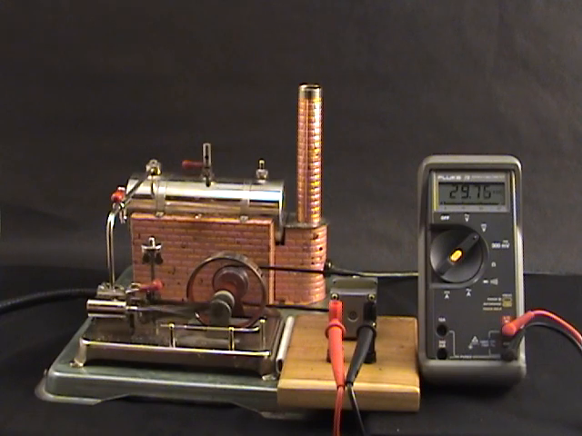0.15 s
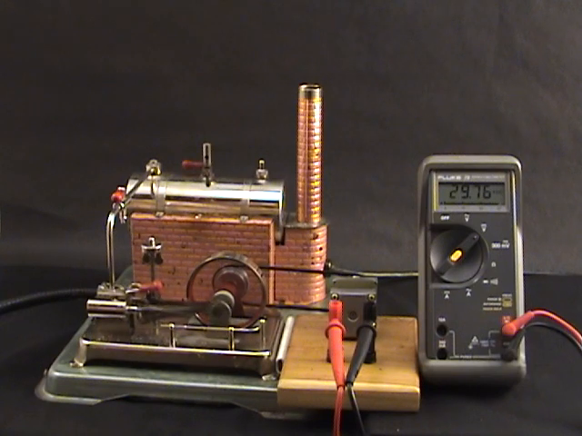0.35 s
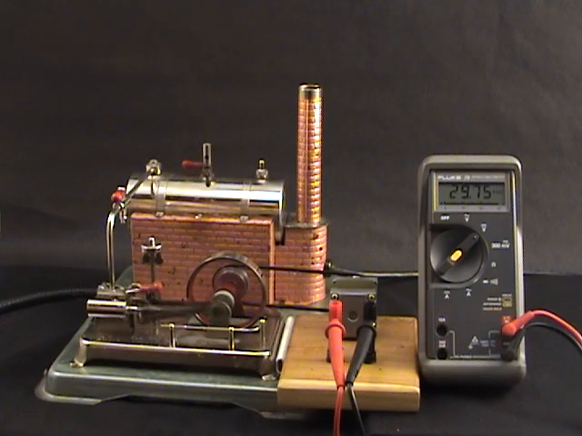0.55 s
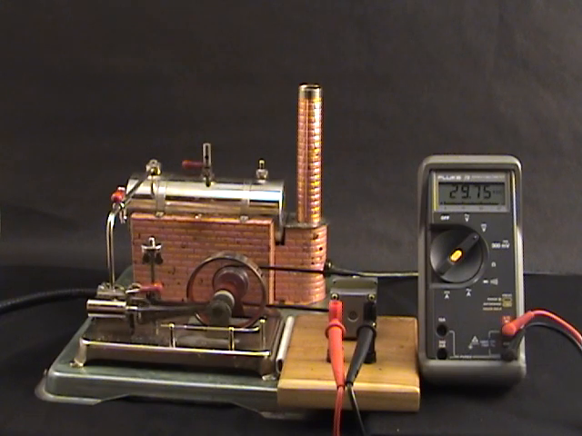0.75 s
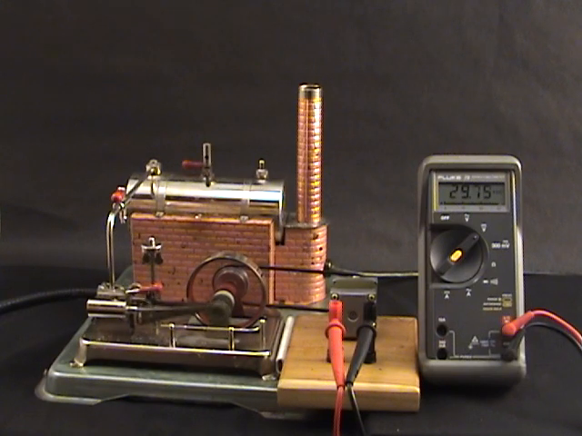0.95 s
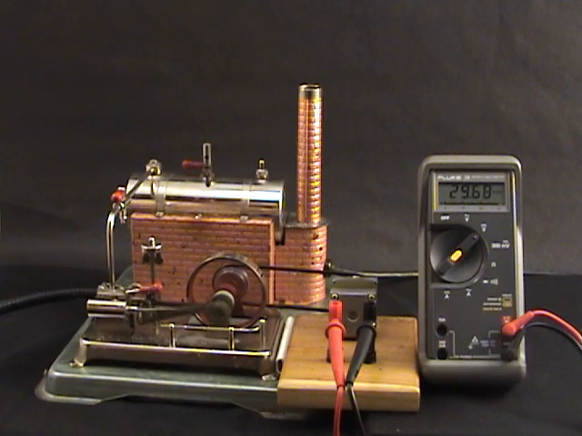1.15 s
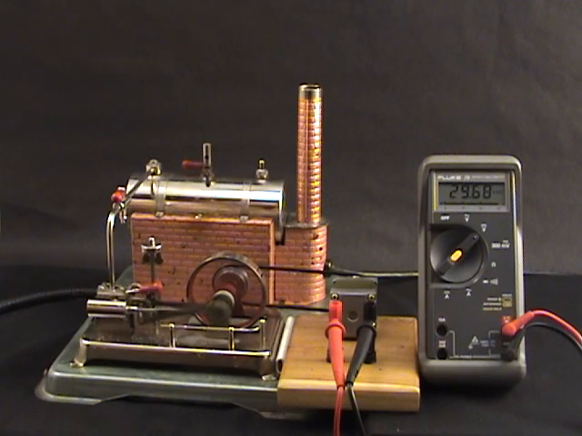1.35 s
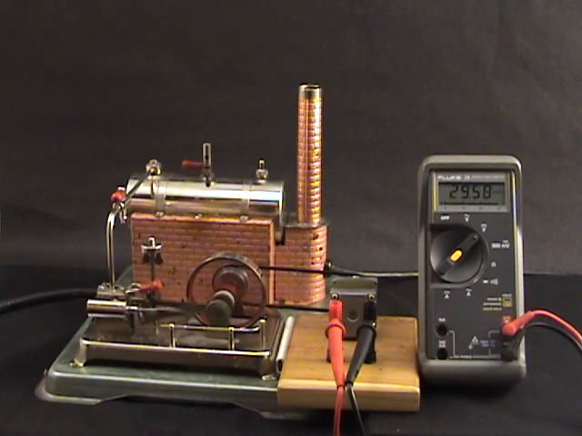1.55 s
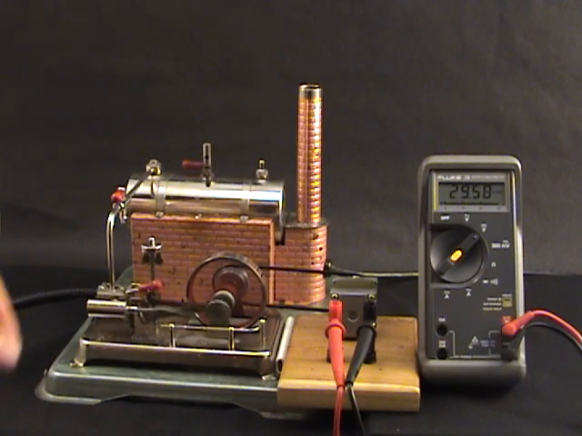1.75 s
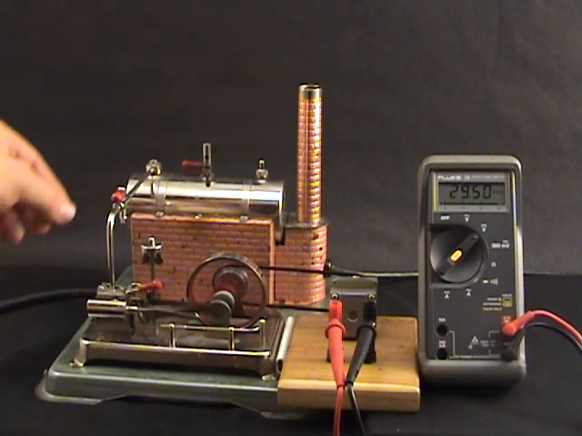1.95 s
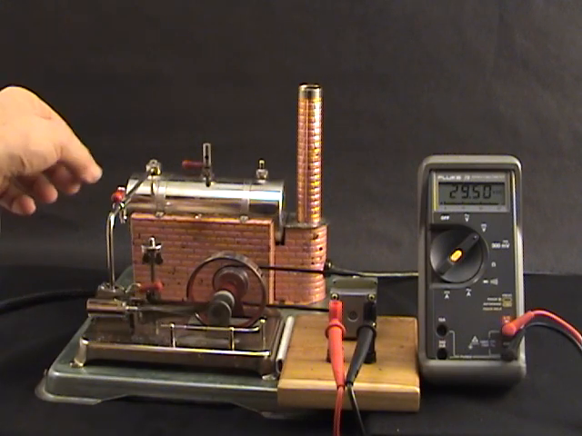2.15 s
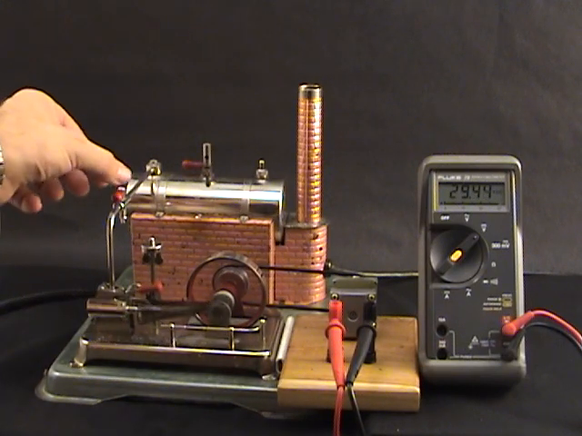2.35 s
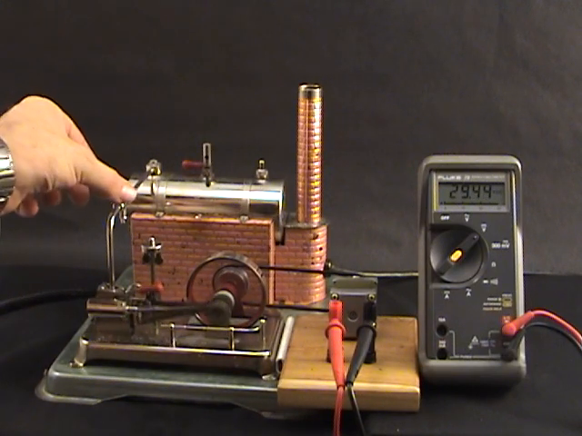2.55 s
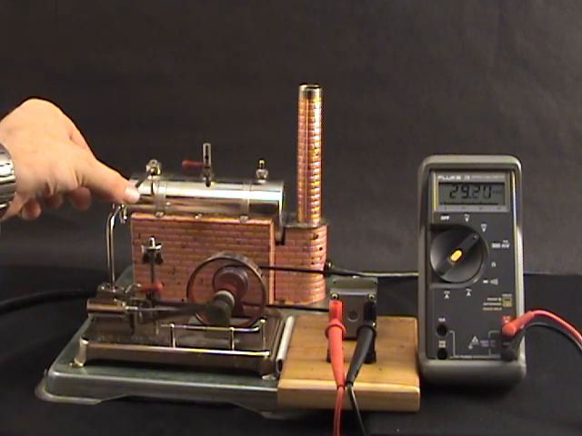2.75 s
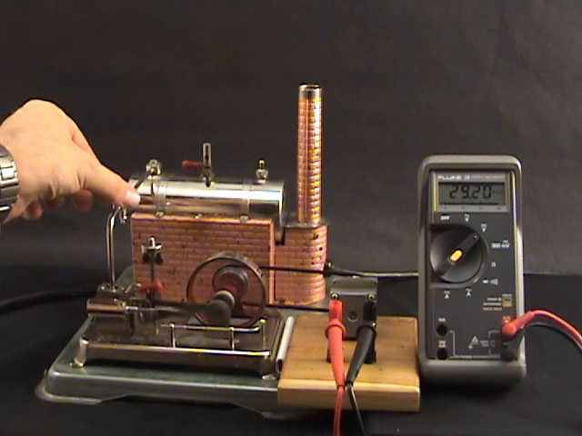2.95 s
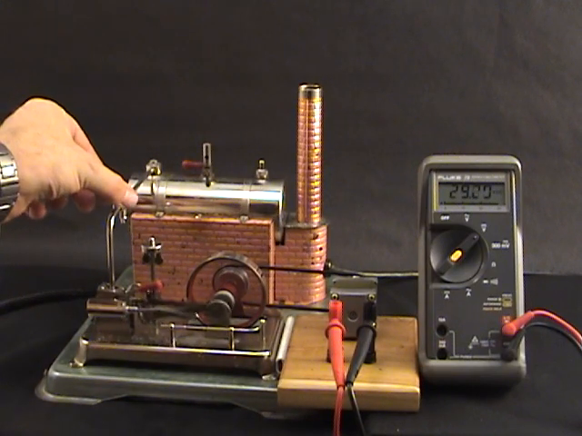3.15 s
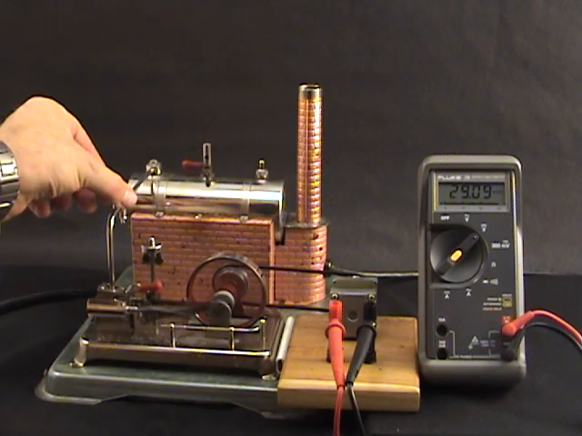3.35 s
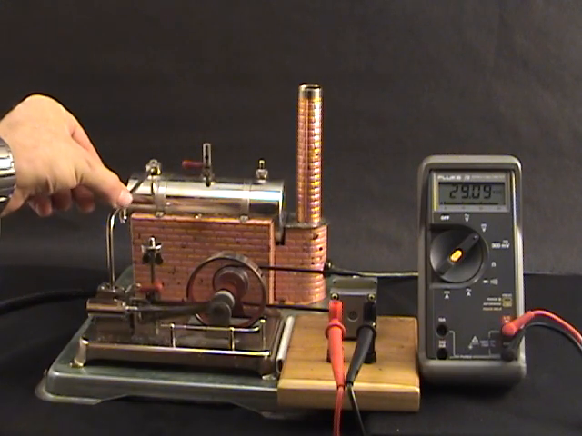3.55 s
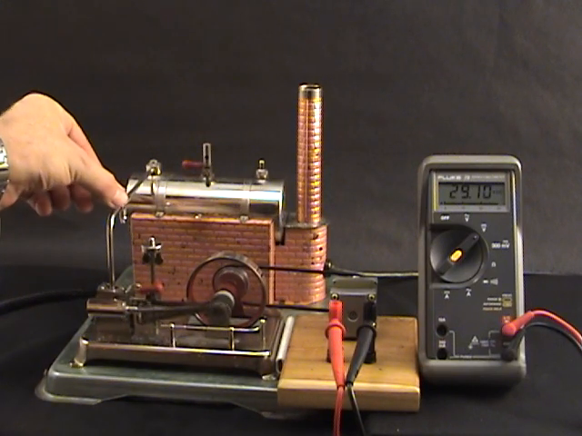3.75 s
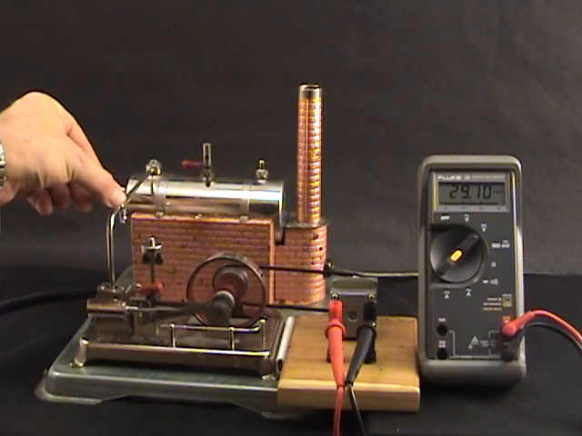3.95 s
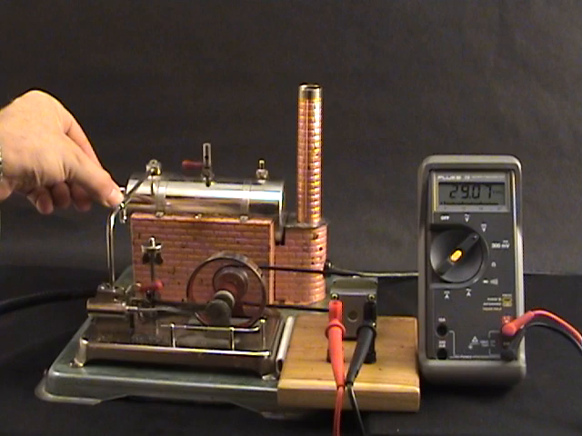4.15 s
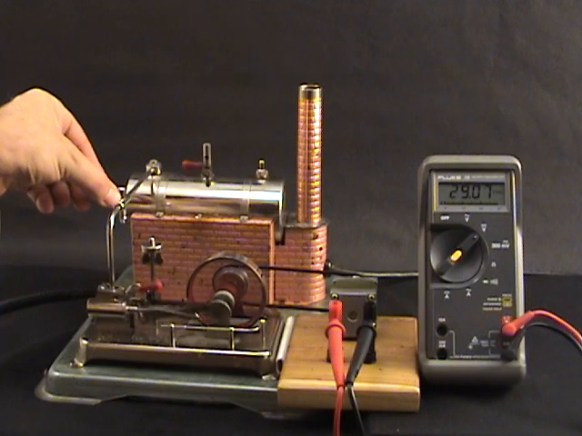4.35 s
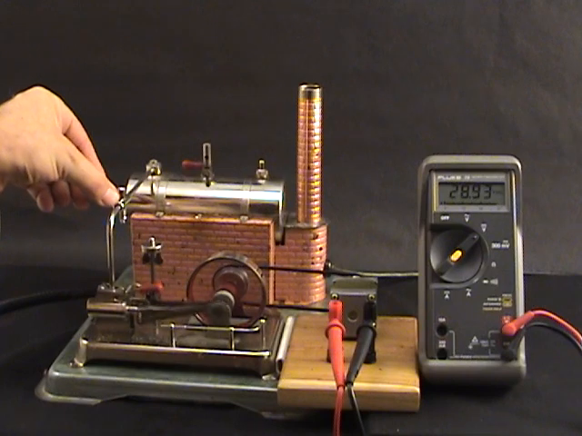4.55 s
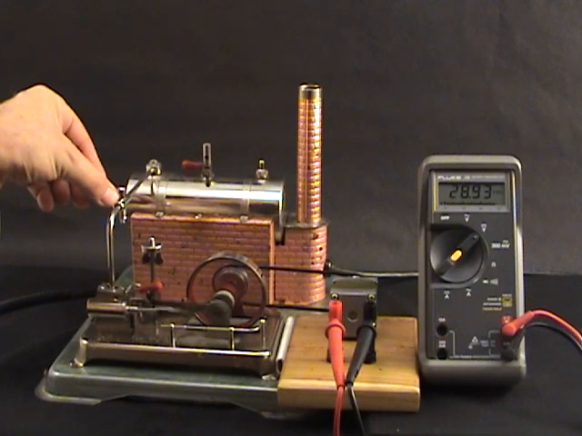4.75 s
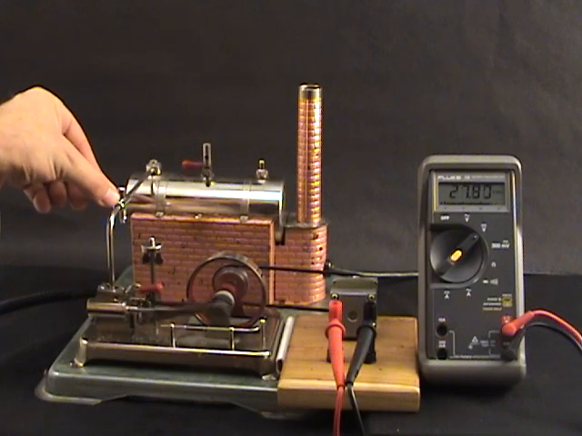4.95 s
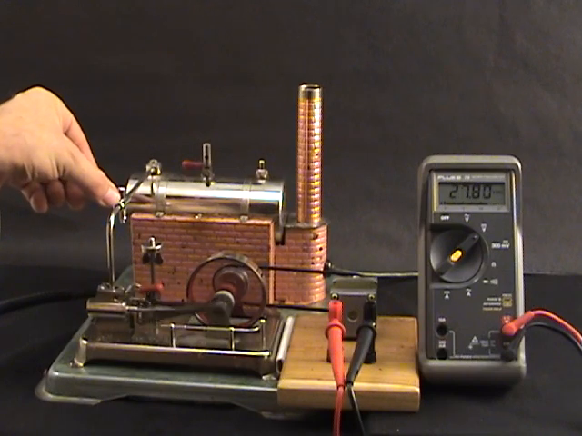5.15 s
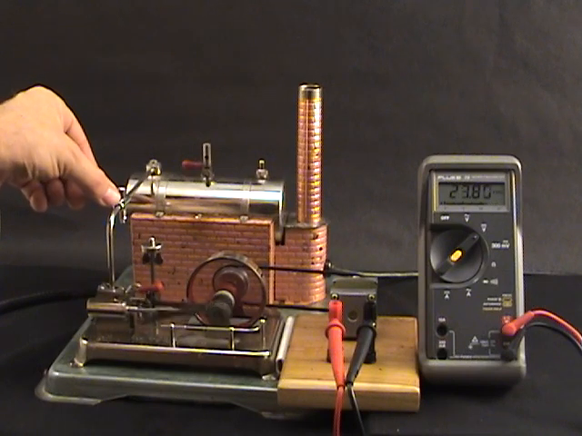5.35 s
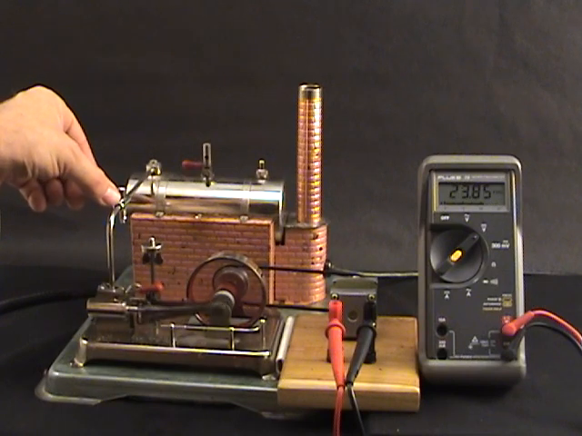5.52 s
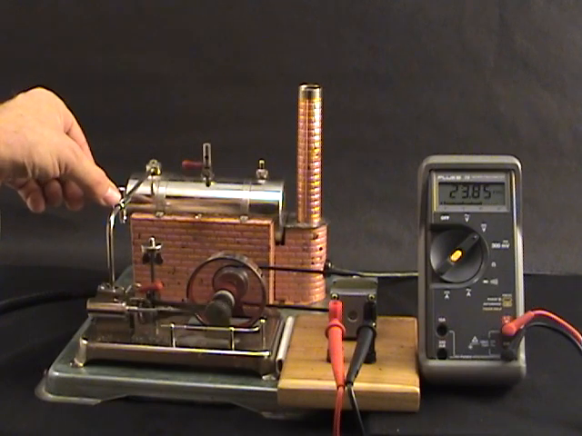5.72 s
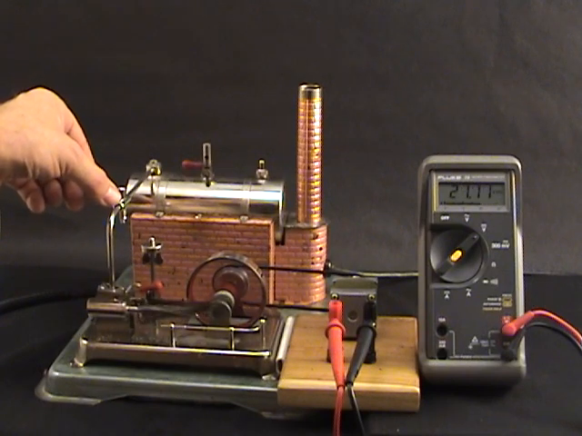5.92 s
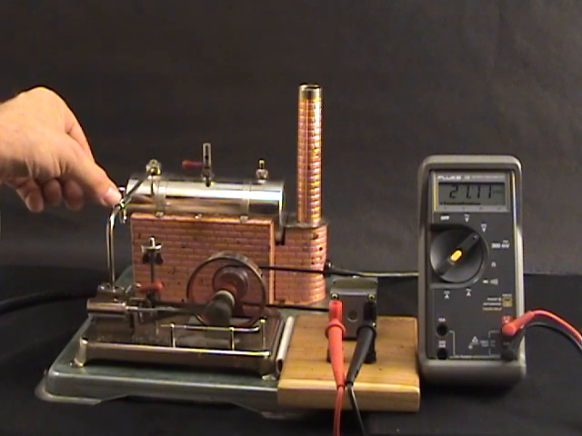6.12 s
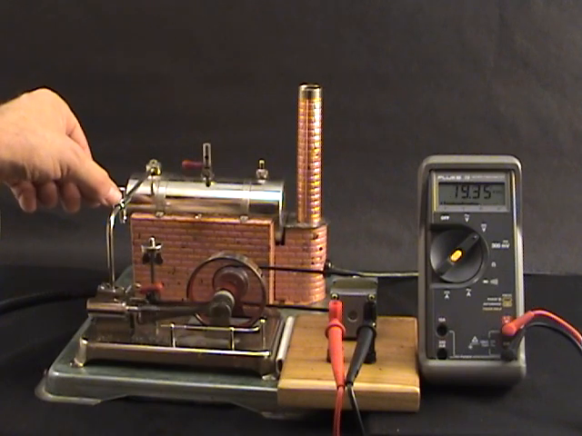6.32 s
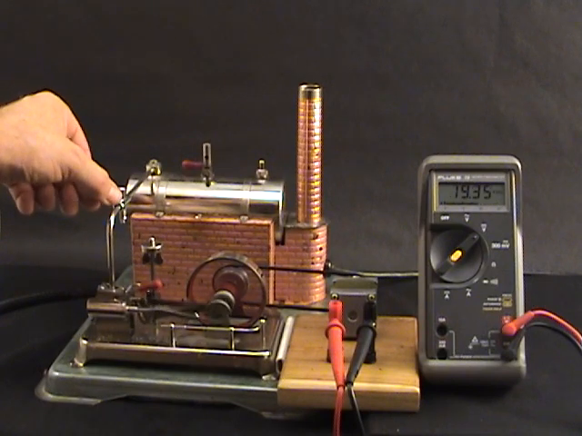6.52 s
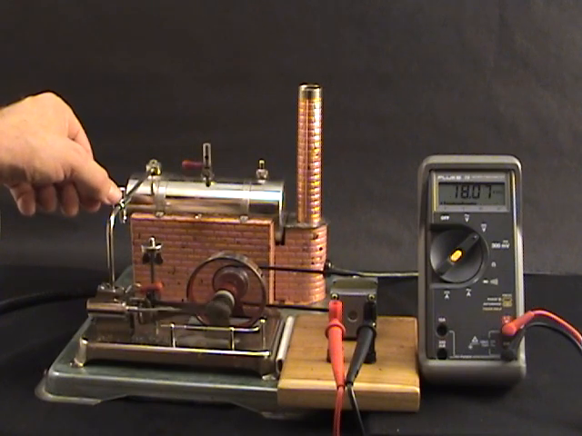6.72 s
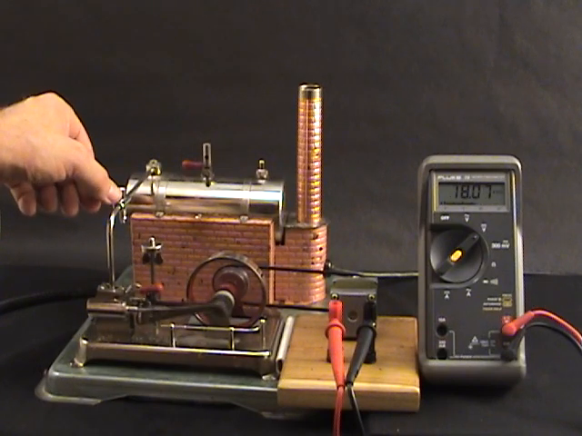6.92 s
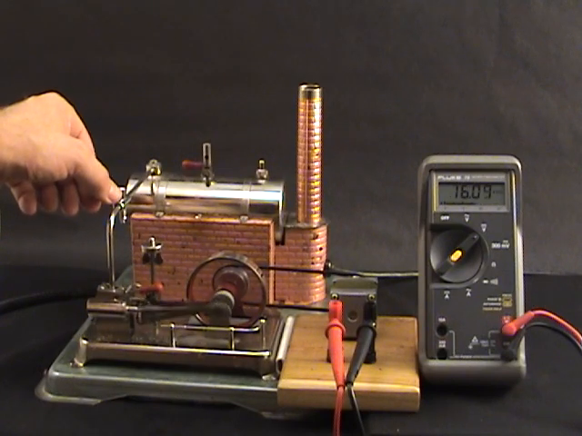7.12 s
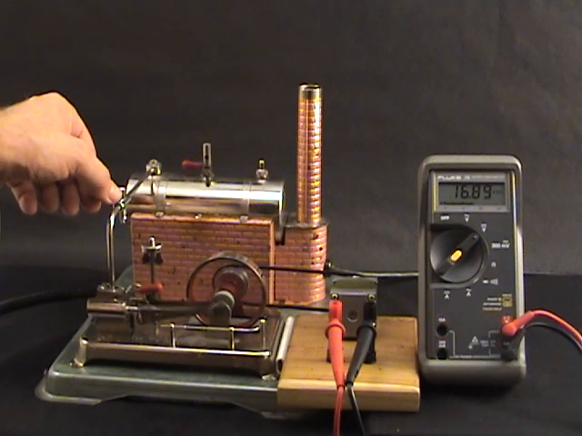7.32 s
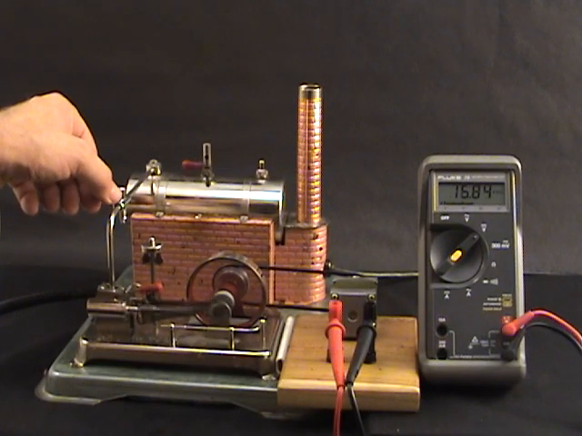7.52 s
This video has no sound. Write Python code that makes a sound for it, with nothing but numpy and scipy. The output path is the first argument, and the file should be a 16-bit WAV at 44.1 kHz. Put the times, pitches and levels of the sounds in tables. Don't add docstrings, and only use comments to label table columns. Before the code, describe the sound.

Rapid metallic chugging of a tabletop steam engine, with hiss and whine, holds steady before running down to slower, still rattling strokes.

```python
import sys
import numpy as np
from scipy import signal
from scipy.fft import rfft, irfft
from scipy.io import wavfile
from scipy.ndimage import uniform_filter1d

SR = 44100
rng = np.random.default_rng(int(sys.argv[2]) if len(sys.argv) > 2 else 0)


def dump(signal):
    limited = np.clip(np.atleast_2d(signal).T, -1, 1)
    pcm = np.round(limited * 32767).astype(np.int16)
    wavfile.write(sys.argv[1], SR, pcm)


def invert_db(x):
    u = np.asarray(x, float) / 20
    return 10 ** u


N = 334278
T = np.arange(N) / SR
HAND = np.interp(T, (1.77, 2.46), (0, 1))
SHUT = np.interp(T, (4.15, 4.52), (0, 1))


def unit(x):
    return x / np.sqrt(np.mean(x ** 2))


def ring(x, modes):
    out = 0
    for k, (hz, width_hz, db) in enumerate(modes):
        r = np.exp(-np.pi * width_hz / SR)
        poles = [1, -2 * r * np.cos(2 * np.pi * hz / SR), r * r]
        out = out + (-1) ** k * invert_db(db) * signal.lfilter([1 - r, 0, r - 1], poles, x)
    return out


def colour(x, points):
    hz, db = np.transpose(points)
    f = np.arange(N // 2 + 1) * SR / N + 1
    return irfft(rfft(x) * invert_db(np.interp(np.log(f), np.log(hz), db)), N)


def walk(rate_hz):
    hold = int(SR / rate_hz)
    steps = np.repeat(rng.standard_normal(N // hold + 1), hold)
    return uniform_filter1d(uniform_filter1d(steps, hold), hold)[:N]


def bump(turns, angle, width):
    off_centre = (turns - angle + .5) % 1 - .5
    return np.exp(-.5 * (off_centre / width) ** 2)


def ticks(turns, angle, scatter_db, slack_ms):
    chance = rng.standard_normal((int(turns[-1]) + 3, 2))
    passes = np.arange(-1, len(chance) - 1) + angle
    at = np.interp(passes, turns, np.arange(N), -9e3, -9e3) + slack_ms * SR / 1000 * chance[:, 0]
    keep = (at > 0) & (at < N - 2)
    at = at[keep]
    size = invert_db(scatter_db * chance[keep, 1])
    out = np.zeros(N)
    np.add.at(out, at.astype(int), size * (1 - at % 1))
    np.add.at(out, at.astype(int) + 1, size * (at % 1))
    return out


# f/Hz, level of side over mid/dB
SIDE_SHARE = [(40, -7), (120, -18.5), (400, -19.5), (1200, -17), (2400, -17.5), (4400, -11.5), (8500, -4),
              (15000, -9.5)]


def room(drone, clatter):
    t60_s, room_db, left_db = 0.38, -10.5, -0.5
    t = T[:SR // 3]
    echoes = rng.standard_normal((2, len(t))) * np.exp(-np.log(1000) * t / t60_s) * (t > .002)
    echoes[1] *= np.exp(-t / .03)
    echoes /= np.sqrt(np.sum(echoes ** 2, axis=1, keepdims=True))
    mid = drone + clatter + invert_db(room_db) * signal.fftconvolve(clatter, echoes[0])[:N]
    side = colour(0.29 * mid + signal.fftconvolve(mid, echoes[1])[:N], SIDE_SHARE)
    return np.array([(mid + side) * invert_db(left_db / 2), (mid - side) * invert_db(-left_db / 2)])


# crank order, free-running level/dB rms, level with the hand on the valve/dB rms
TABLE_ORDERS = [(1, -65, -67.7), (2, -66, -77), (3, -55, -60), (4, -55.5, -49), (5, -47, -57),
                (6, -50, -62), (7, -52, -44.5), (8, -49.5, -44), (9, -38, -41), (10, -87, -54),
                (11, -57, -49.5), (12, -46, -55), (13, -36, -36), (14, -64, -48.1)]
BASE_ORDERS = [(15.13, -73, -58), (16, -47.6, -46), (17, -52, -57), (18, -23, -21.5), (19, -35, -28),
               (20, -27.5, -29), (21, -54, -44), (22, -45, -41), (23, -56, -48), (24, -30.5, -38),
               (25, -42, -34.5), (26, -52, -41), (27, -32, -42), (28, -55, -31.5)]
CHIMNEY_ORDERS = [(29.38, -30.5, -38.5), (30, -36.5, -47), (31, -34.5, -41.5), (32, -29, -35),
                  (33, -26, -33.5), (34, -95, -85.5), (35, -20.5, -28), (36, -32, -25), (37, -37.5, -31.5),
                  (38, -29.5, -32), (39, -41, -58), (40, -46, -32), (41, -67, -85), (42.07, -35.5, -38),
                  (43, -71, -45), (44, -48, -46), (45.6, -75, -56)]
ORDER_LAG = [
    (-.328, .038),
    (-.076, .01),
    (-.268, .024),
]


def hum(turns, orders, angle, lag):
    out = 0
    for k, free_db, held_db in orders:
        k = round(k)
        db = free_db + (held_db - free_db) * HAND + 0.55 * walk(6.27)
        phase = k * (turns - angle) - lag * (k - orders[0][0]) ** 2
        out = out + invert_db(db) * np.cos(2 * np.pi * phase)
    return np.sqrt(2) * out


def vibration(turns, pace, body_db):
    table = hum(turns, TABLE_ORDERS, *ORDER_LAG[0])
    body = hum(turns, BASE_ORDERS, *ORDER_LAG[1]) + hum(turns, CHIMNEY_ORDERS, *ORDER_LAG[2])
    return table * pace ** 2.68 + invert_db(body_db) * body


# f/Hz, level/dB per Hz
LEAK_SPECTRUM = [(30, -14.5), (200, -8.5), (500, 6.5), (1060, 2), (2500, -5.5), (4200, 0), (9000, -10),
                 (15800, -30.5)]


def leak(turns, leak_db):
    swell_db = 2.3 * np.cos(4 * np.pi * (turns - .05)) + 0.31 * walk(30)
    return invert_db(leak_db + swell_db) * unit(colour(rng.standard_normal(N), LEAK_SPECTRUM))


# crank order, level/dB, housing resonance f/Hz, reach/Hz
SLOT_TONES = [(149.3, 4.5, 2600, 1600), (203, -1.5, 2520, 130), (402, 6.5, 4560, 240)]


def dynamo(speed, turns, whine_db):
    belt_lag_s, swing, flutter = .04, .018, .007
    belt = np.interp(T - belt_lag_s, T, speed)
    belt = belt * (1 + swing * np.sin(2 * np.pi * turns) + flutter * walk(60))
    angle = 2 * np.pi * np.cumsum(belt) / SR
    out = 0
    for order, db, housing_hz, reach_hz in SLOT_TONES:
        tone_db = whine_db + db + 1.0 * walk(45) + 3.4 * np.cos(4 * np.pi * turns)
        housing = np.exp(-.5 * ((order * belt - housing_hz) / reach_hz) ** 2)
        out = out + np.sqrt(2) * invert_db(tone_db) * np.sin(order * angle) * housing
    return out


# angle/turns, chimney level/dB, base level/dB
PUSHES = [(-.2, -13, -0.5), (-.1, -15, -22), (.33, -14, -3.5), (.46, -19, -1.3)]
# f/Hz, width/Hz, level/dB
CHIMNEY_MODES = [(692, 39, -0.5), (610, 56, 1), (744, 20, 8.5), (600, 106, -20), (960, 18, -33)]
BASE_MODES = [(359, 14, 5.5), (408.5, 14, -5), (501, 186, -7.5), (259, 77, -7.5), (192, 37, -8.5),
              (128, 35, -11.5)]


def exhaust(turns, chimney_db, base_db, valve_db, valve_angle):
    late = invert_db(valve_db + 29.1) * bump(turns - valve_angle, 0.16, 0.11)
    flow = bump(turns, -0.058, 0.079) + late
    force = invert_db(-7.5 - 27.5) * (flow + 0.59) * rng.standard_normal((2, N))
    sing_hz, sing_db = 698.7, -34.5
    cycles = np.cumsum(sing_hz * (1 + 0.00603 * walk(25))) / SR
    cycles += rng.random(300)[(2 * turns + 1.5).astype(int)]
    force[0] += invert_db(sing_db) * flow * invert_db(1.1 * walk(12)) * np.sin(2 * np.pi * cycles)
    for angle, *push_db in PUSHES:
        force += invert_db(np.array(push_db))[:, None] * ticks(turns, angle, scatter_db=-0.5, slack_ms=0.14)
    chimney = invert_db(chimney_db) * unit(ring(force[0], CHIMNEY_MODES))
    return chimney + invert_db(base_db) * unit(ring(force[1], BASE_MODES))


CLEAN_BLOW = np.array([[3.], [1.5], [3.5], [.2]])


def knocks(turns, table, sharp):
    force = np.zeros((4, N))
    for angle, rattle_ms, *part_db in table:
        blow = ticks(turns, angle, scatter_db=0.98, slack_ms=0.238)
        fade = signal.lfilter([1], [1, -np.exp(-1000 / (rattle_ms * SR))], blow)
        fade = uniform_filter1d(fade, int(SR * .0012), origin=int(SR * .0005))
        grit = rng.standard_normal(N) * invert_db(1.2 * rng.standard_normal(N))
        force += invert_db(np.array(part_db))[:, None] * (sharp * CLEAN_BLOW * blow + fade * grit)
    return force * np.sqrt(SR / 2000)


# angle/turns, rattle length/ms, then plate, shell, cylinder and thin parts level/dB
ROD_KNOCKS = [(-.034, 3.53, -1, -2, 0, -4), (.47, 3.6, -0.5, -8, -11.5, -11),
              (.1, 1.45, -28, -10.5, -7.5, -10.5), (.7, 1.15, -5.5, -6.5, -47, -10)]
CROSSHEAD_KNOCKS = [(-.19, 3.75, 8, -3, -4, 0), (.56, 4.3, -8, -11, -2.5, -7)]
VALVE_KNOCKS = [(0, 2.07, -2, -3, -1, -4.5), (.06, 2, -6, -11.5, -6, -3)]
# f/Hz, width/Hz, level/dB
PLATE_MODES = [(995, 15.5, -10), (1164, 44, -6.5), (1597, 64, -7.5), (1829, 69, -2.5), (2016, 122, -4.5),
               (2538, 85, -14.5)]
SHELL_MODES = [(2936, 78, -8), (3317, 225, -9), (3728, 220, -2.5), (3915, 90, 2.5)]
CYLINDER_MODES = [(4176, 224, -2), (4490, 450, -8), (5113, 158, -6)]
THIN_MODES = [(5536, 450, -0.5), (6210, 550, 0.5), (6850, 370, 0), (7820, 690, -7), (8660, 380, -6),
              (9560, 145, -3.5), (10400, 1600, -16.5), (14100, 3900, -25)]
PARTS_DB = -5.5, 0, -2.5, -6.5
SLOW_DB = -1.3, -5.5, 1, -2


def metalwork(turns, slow, rod_db, cross_db, valve_db, valve_angle):
    force = invert_db(rod_db) * knocks(turns, ROD_KNOCKS, sharp=2.8)
    force = force + invert_db(cross_db) * knocks(turns, CROSSHEAD_KNOCKS, sharp=1.9)
    force = force * invert_db(np.outer(SLOW_DB, slow))
    force = force + invert_db(valve_db) * knocks(turns - valve_angle, VALVE_KNOCKS, sharp=2.56)
    parts = PLATE_MODES, SHELL_MODES, CYLINDER_MODES, THIN_MODES
    return invert_db(16) * sum(invert_db(db) * ring(f, modes) for f, modes, db in zip(force, parts, PARTS_DB))


# full-steam level/dB, change with the hand on the valve/dB,
# change once shut/dB, change per halving of speed/dB
LAYERS = [
    (-24.5, -0.06, 1.43, -7.5),
    (-32, -0.4, -19.5, 11),
    (-30.5, 4.5, 1, 0),
    (-39.5, 3.5, 10, -2.5),
    (-38, -0.44, 10, -2.5),
    (-27, 0.3, 0.8, -15),
    (-45.5, 6, 5.5, -20),
    (-2, 1.2, -6, -40),
]


def levels(speed, halvings):
    db = np.array(LAYERS) @ np.array([np.ones(N), HAND, SHUT, halvings])
    db[2] += -18 / (1 + np.exp((speed - 12.33) / 0.35))
    db[-1] = np.maximum(db[-1], -35)
    return db


# t/s, speed/turns per s
SPEED = [(0, 19.599), (1.1, 19.463), (1.7, 19.43), (2.65, 19.134), (3.47, 19.169), (4.32, 18.985),
         (4.61, 18.106), (4.98, 15.5), (5.44, 13.76), (5.95, 12.522), (7.12, 10.552), (7.7, 9.744)]


def scene():
    speed = np.interp(T, *np.transpose(SPEED))
    turns = -.155 + np.cumsum(speed) / SR
    speed = uniform_filter1d(speed, SR // 9, mode="nearest")
    pace = speed / speed.max()
    halvings = np.log2(speed.max() / speed)
    valve_angle = .385 - .06 * SHUT - .05 * halvings
    rod, cross, valve, chimney, base, hiss, whine, body = levels(speed, halvings)
    drone = vibration(turns, pace, body)
    clatter = leak(turns, hiss) + dynamo(speed, turns, whine)
    clatter = clatter + exhaust(turns, chimney, base, valve, valve_angle)
    clatter = clatter + metalwork(turns, 2 - 2 * pace, rod, cross, valve, valve_angle)
    return room(drone, clatter)


def low_pass(x):
    return signal.sosfilt(signal.butter(12, 15950, fs=SR, output="sos"), x)


def record(dry):
    mix = np.tanh(0.81 * dry) / 0.79
    return low_pass(mix)


dry = scene()
out = record(dry)
dump(out)
```